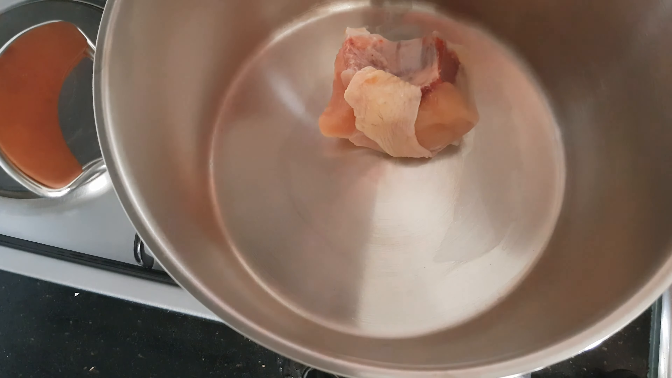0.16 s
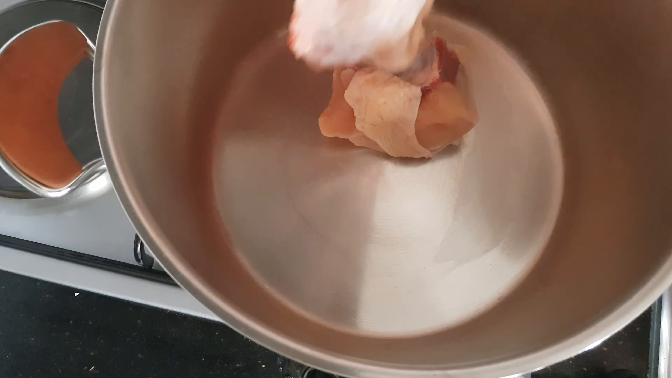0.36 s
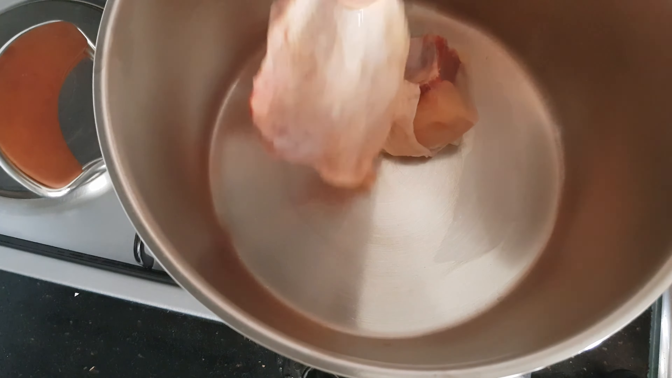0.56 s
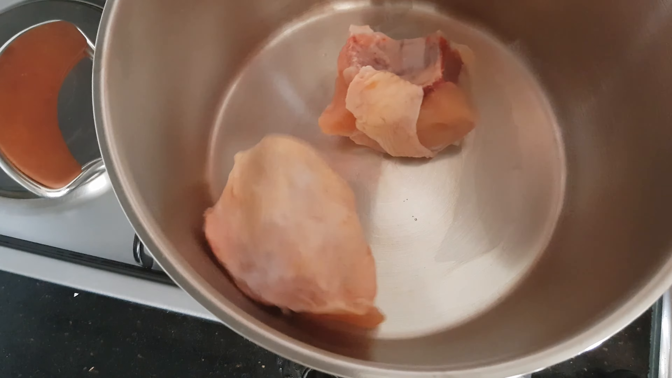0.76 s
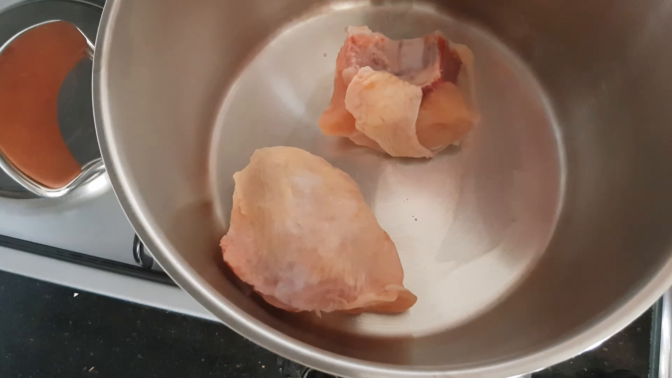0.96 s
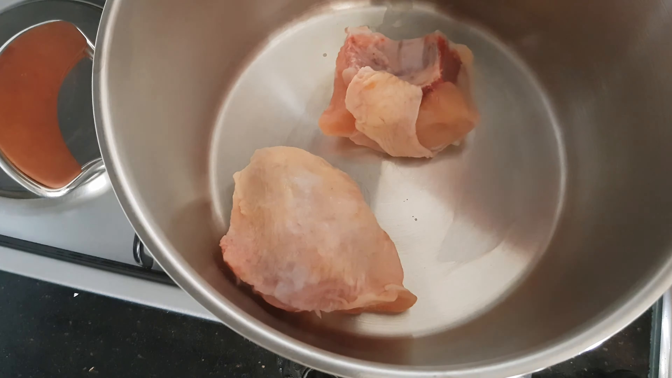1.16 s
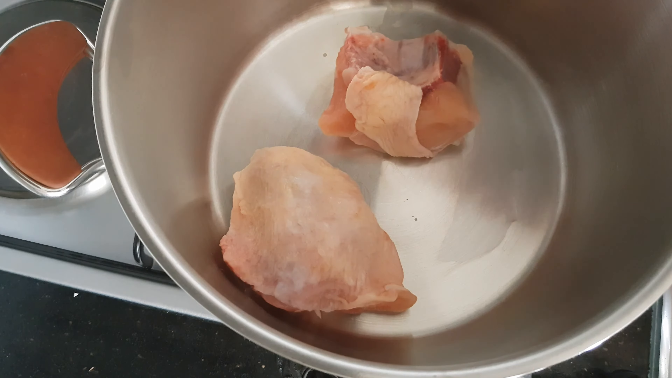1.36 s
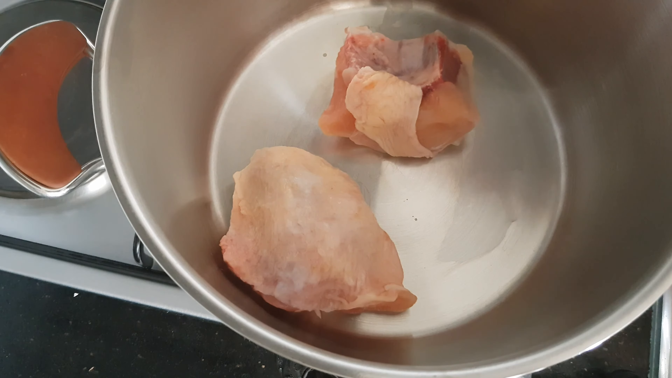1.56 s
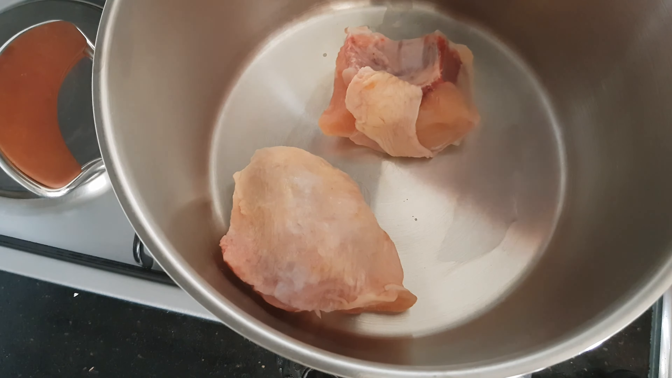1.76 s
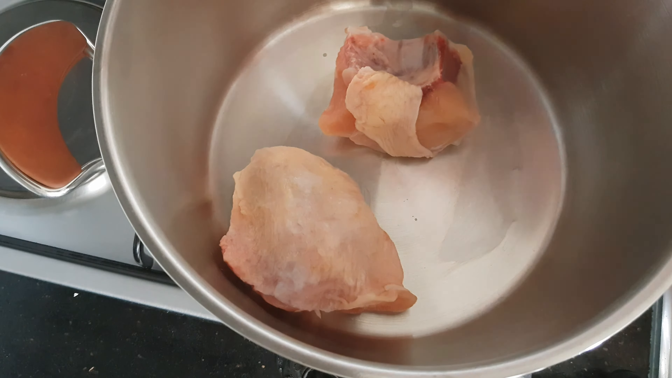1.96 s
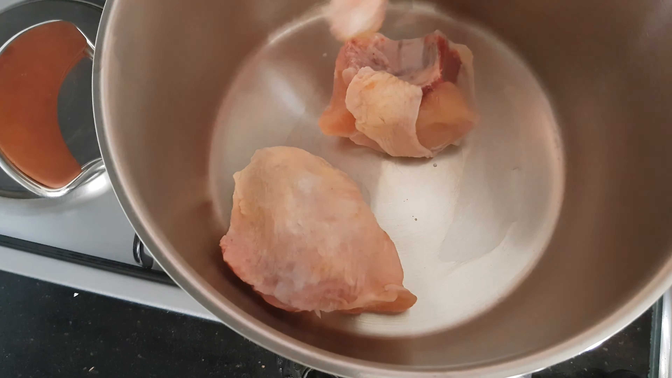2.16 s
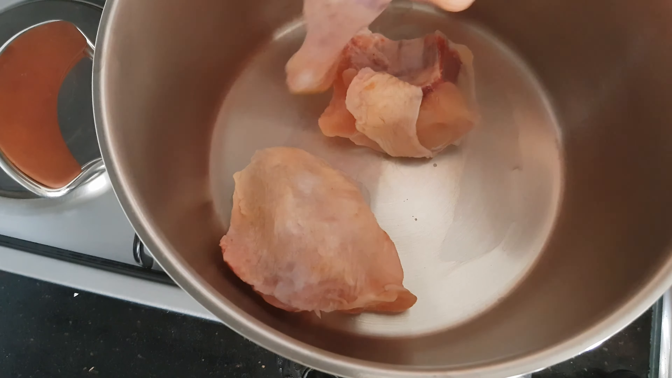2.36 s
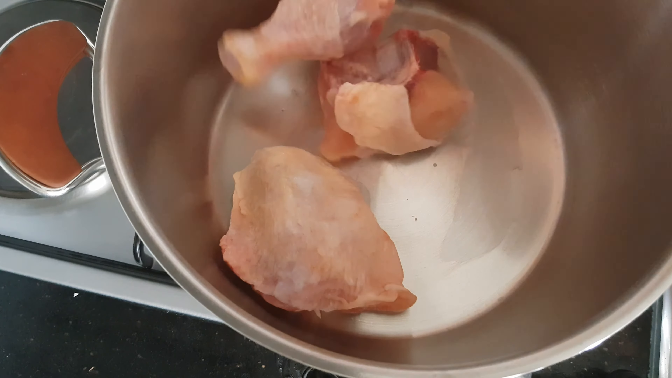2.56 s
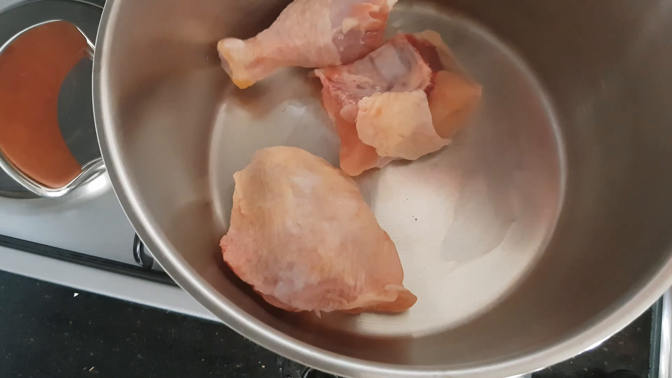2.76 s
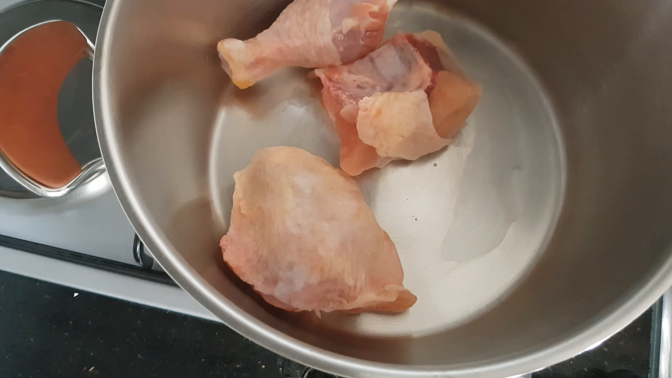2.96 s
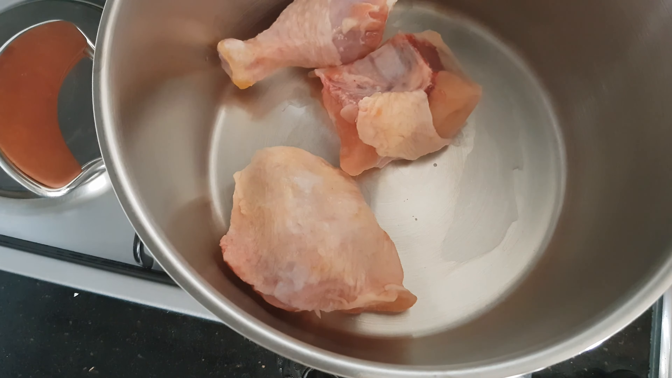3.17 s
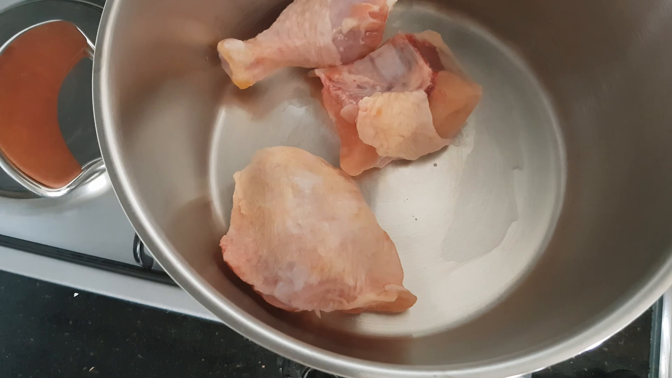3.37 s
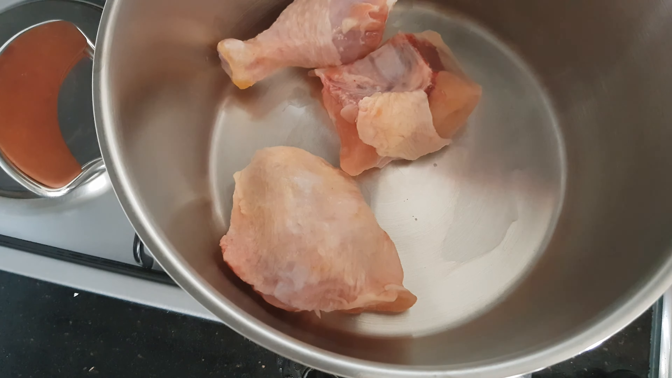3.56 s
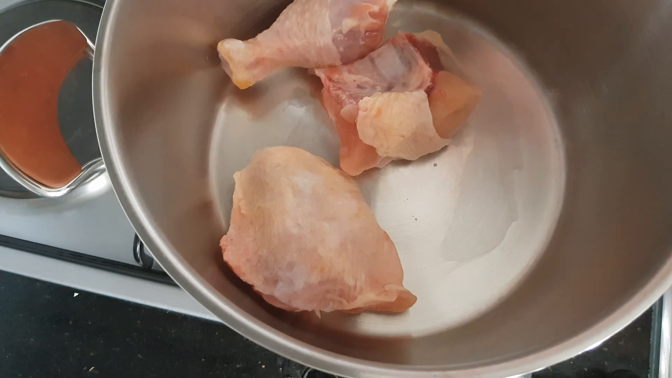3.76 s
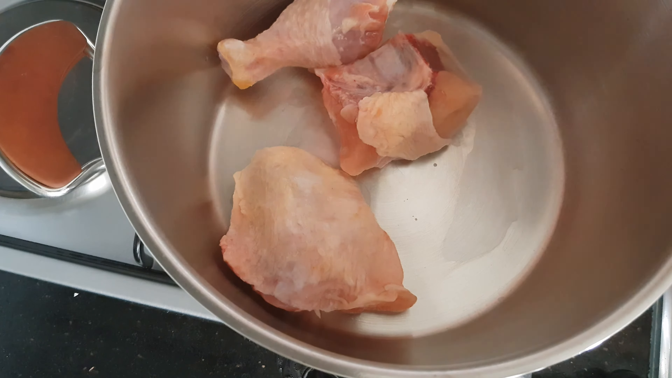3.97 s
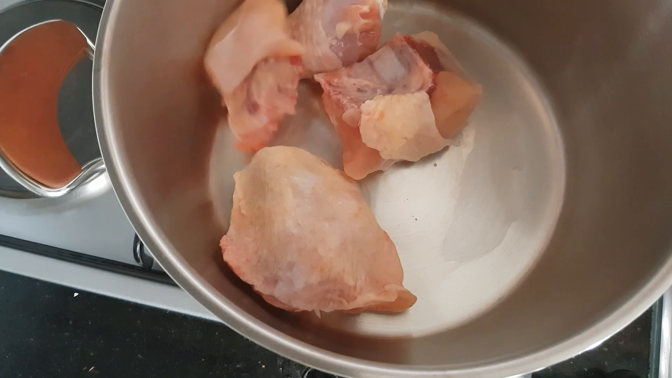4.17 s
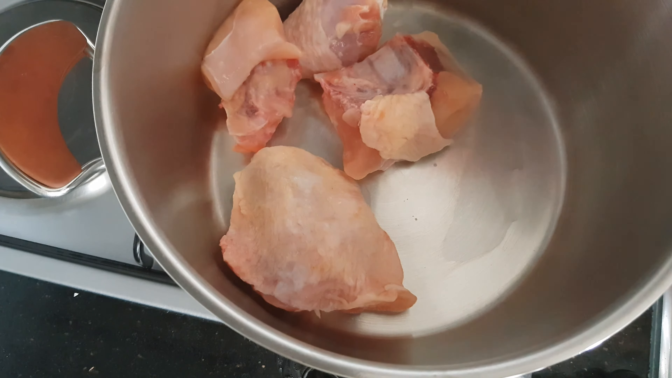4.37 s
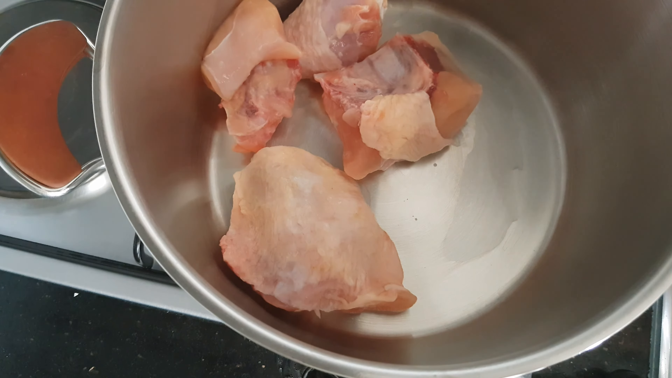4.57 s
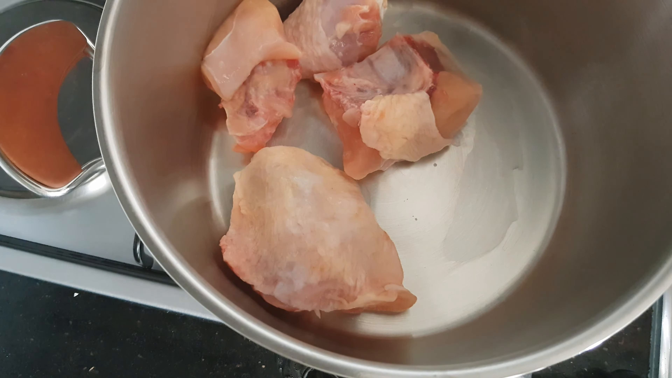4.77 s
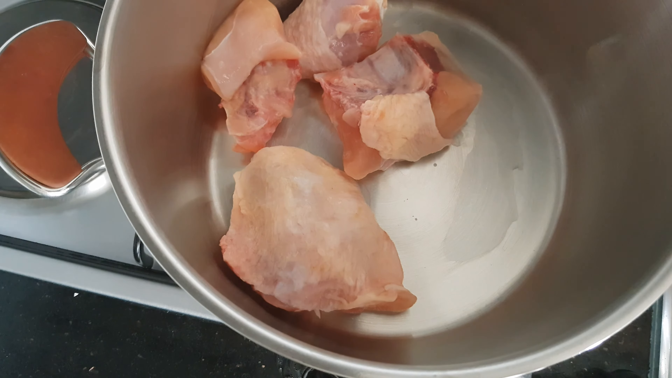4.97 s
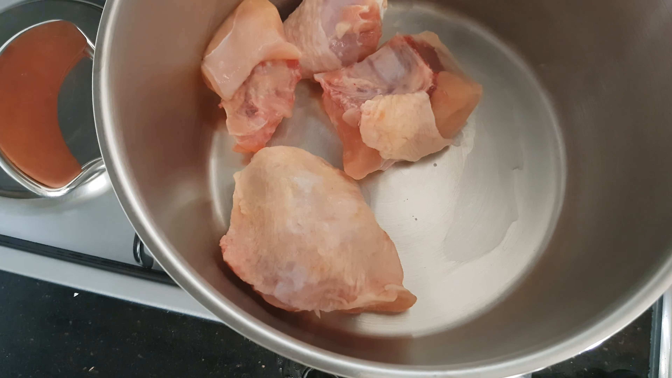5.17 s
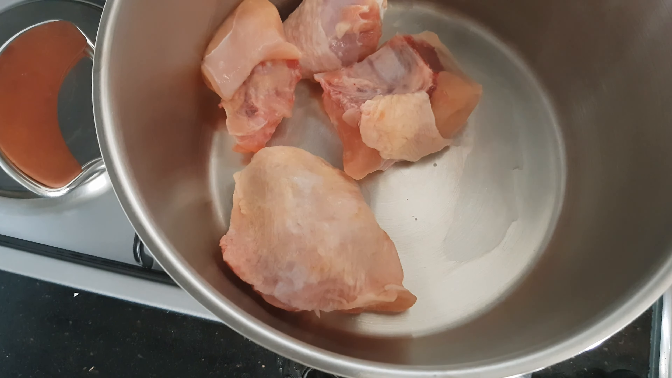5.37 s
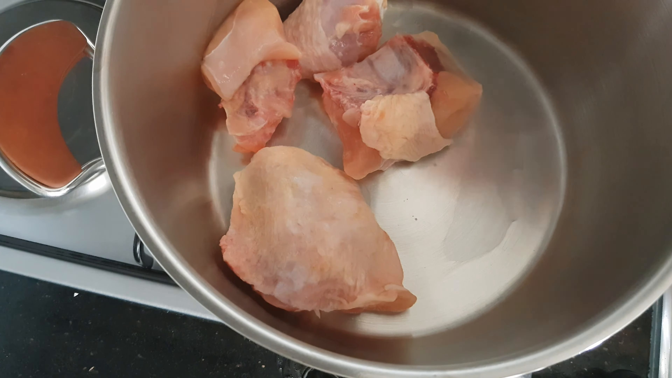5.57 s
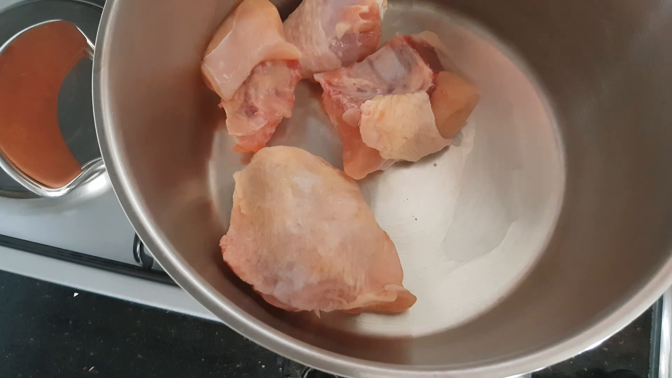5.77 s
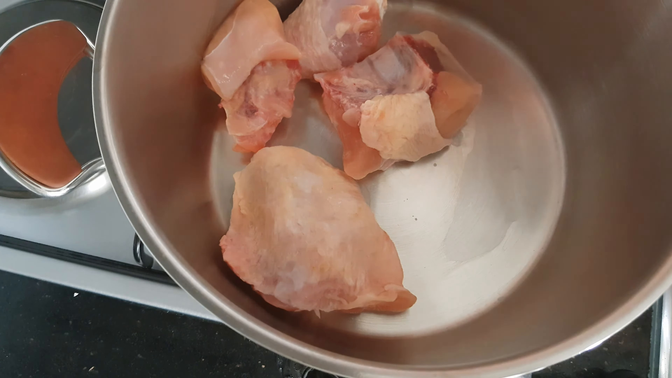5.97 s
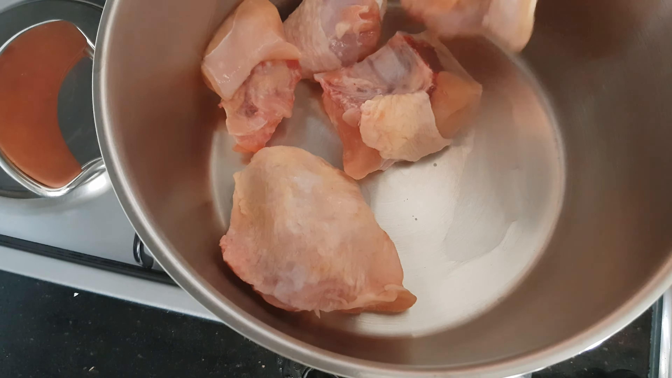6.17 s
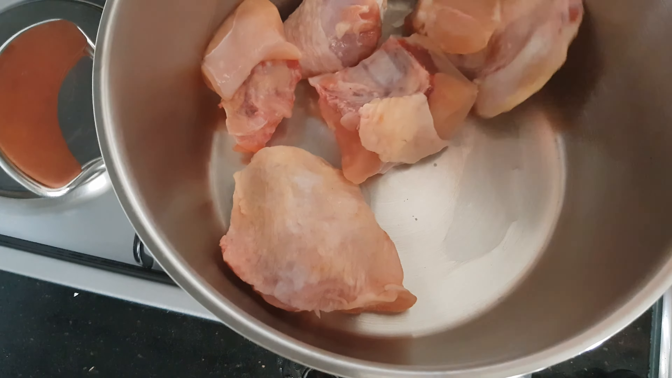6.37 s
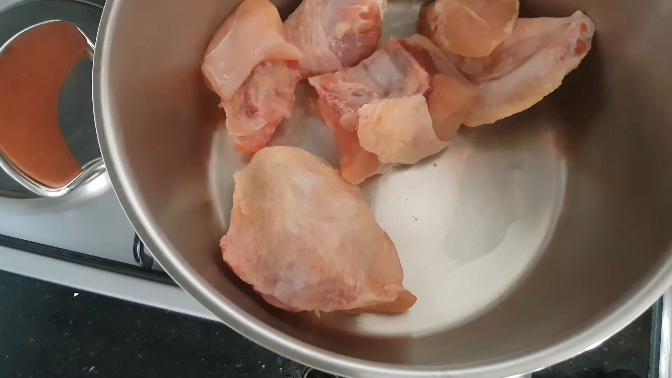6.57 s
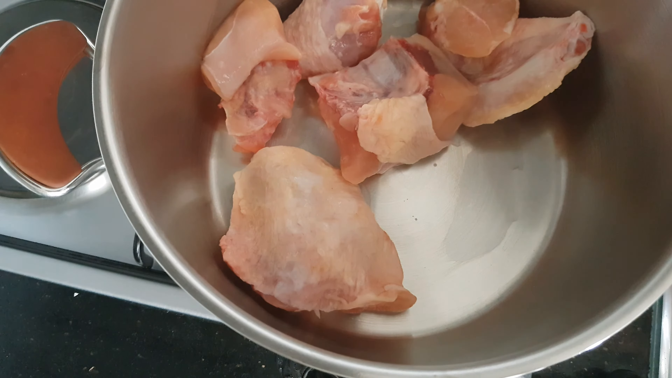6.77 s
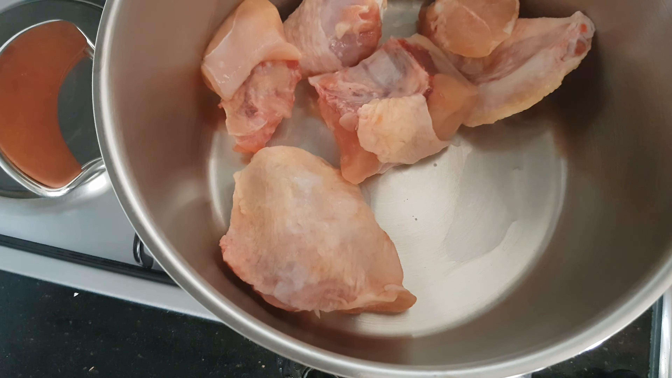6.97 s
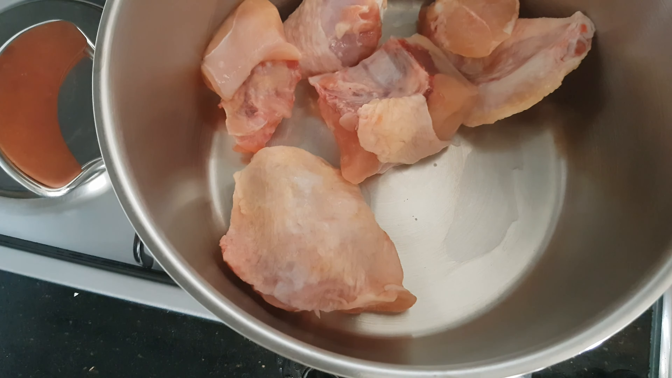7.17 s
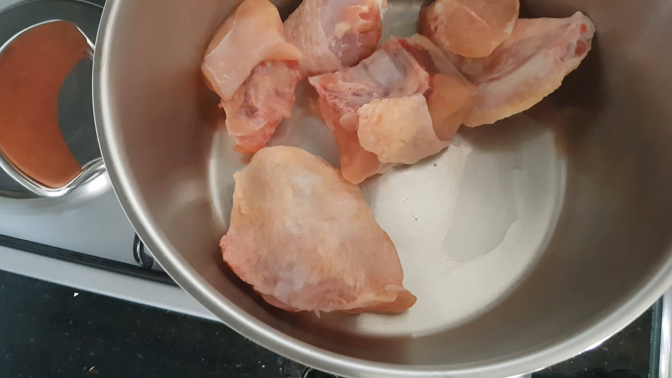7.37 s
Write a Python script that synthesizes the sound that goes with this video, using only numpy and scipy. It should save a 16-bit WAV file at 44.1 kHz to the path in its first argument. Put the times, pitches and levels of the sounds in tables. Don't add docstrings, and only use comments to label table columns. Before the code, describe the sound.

A quiet kitchen, heard closely in stereo, with low airy hum and slow distant traffic rumble throughout. At about 0.6 s raw meat drops into a steel pot: soft low thud, wet slap and squelch, then a flurry of short clanks peaking near 0.77 s as the pot rocks on its grate. Faint sticky ticks follow from 1.2 to 1.7 s. At 2.45 s a second piece smacks down, with firmer clanks at 2.6 and 2.67 s. Fingers click stickily on the right around 3.0-3.25 s. A third, duller and wetter landing comes at 4.05 s, with muted knocks until 4.2 s. More tiny clicks run from 4.6 to 5.4 s. The last piece lands at 6.25 s, the brightest clank at 6.3 s, rattling until 6.6 s with short echoes and low swaying. A faint wet touch comes at 7.2 s.

```python
import sys
import numpy as np
from scipy import signal
from scipy.fft import rfft, irfft, next_fast_len
from scipy.io import wavfile
from scipy.ndimage import uniform_filter1d

SR = 44100
rng = np.random.default_rng(int(sys.argv[2]) if len(sys.argv) > 2 else 0)


def magnitude_from_level(level_db):
    exponent = np.asarray(level_db, float) / 20
    return 10 ** exponent


def to_wav(sig):
    pcm = np.clip(np.atleast_2d(sig), -1, 1) * 32767
    pcm = np.round(pcm).astype(np.int16)
    wavfile.write(sys.argv[1], SR, pcm.T)


N = 327655


def evened(x):
    return x / np.sqrt(np.mean(np.abs(x) ** 2) + 1e-20)


def read(points, hz):
    f, value = np.transpose(points)
    return np.interp(np.log(hz + 1), np.log(f + 1), value)


def add(mix, start_s, sound):
    part = mix[:, round(start_s * SR):][:, :sound.shape[1]]
    part += sound[:, :part.shape[1]]


def sides(pan_db):
    return magnitude_from_level(np.array([[pan_db / 2], [-pan_db / 2]]))


def colour(x, points):
    size = next_fast_len(x.shape[-1])
    gain = magnitude_from_level(read([(1, -90)] + list(points), np.fft.rfftfreq(size, 1 / SR)))
    shaped = irfft(rfft(x, size) * gain, size)
    return evened(shaped[..., :x.shape[-1]])


def crackle(per_s, spread_db, same):
    size = magnitude_from_level(spread_db * np.minimum(rng.exponential(1, N), 4)) * (rng.random(N) < per_s / SR)
    shared, left, right = rng.standard_normal((3, N))
    puffs = 1 + signal.oaconvolve(size, np.exp(-np.arange(200) / 17.0))[:N]
    same = np.clip(same, 0, 1)
    return puffs * (same * shared + np.sqrt(1 - same ** 2) * np.array([left, right]))


def held(rows, rise_s):
    t, power = np.arange(N) / SR, np.zeros(N)
    for start_s, hold_s, db, t60_s in rows:
        release_db = -60 * np.maximum(t - start_s - hold_s, 0) / max(t60_s, .02)
        rise = np.clip((t - start_s) / rise_s, 0, 1)
        power += (magnitude_from_level(db + release_db) * rise) ** 2
    return np.sqrt(power)


def pot():
    # start in seconds, peak in dB, low modes in dB,
    # wall modes in dB, high modes in dB.
    clanks = [(0.658, -32.5, 6.5, -17, -12), (0.694, -34, 8, -3, -12), (.743, -36.5, 6, -10, -13),
              (.774, -20.5, -2, 0.5, -4), (0.8108, -25, 1, 12, -10), (0.839, -32.5, -1, 5, -7),
              (2.462, -36, 0, 1, -34), (2.566, -56, -10, -2, 10), (2.6007, -22, -3, -9, -9.5),
              (2.6727, -18, -4, -14, -7.5), (2.714, -33, -2, -11, -15), (4.075, -27, 4.5, -19, -5),
              (4.11, -23.5, -3, -26, -7), (4.172, -30, -5, -14, -16), (4.2067, -39.5, 5, -11, -14),
              (6.249, -49, 4, 7, -7), (6.274, -29, 7, 0, -12), (6.314, -14.5, -2, 15, -7.5),
              (6.414, -20.5, 0.5, -2, -6.5), (6.4904, -23.5, -2.5, -1.5, -8), (6.538, -41, 4, -15, -20),
              (6.583, -43, 5, -16, -31)]
    # start in seconds,
    # left-right in dB, floor pair in dB, rim pair in dB, top modes in dB.
    landings = [
        (.6, 2, -6.5, -1, -6),
        (2.4, 2.4, -2.4, -5.5, 1),
        (4.0, 5, 0.5, -12, -9),
        (6.2, 1.5, 0, 1, 0.5),
    ]
    mode_hz = [486, 955, 1248, 1578, 1895, 1990, 2060, 2190, 2270, 2475, 2665, 2800, 2890, 3275, 3450, 3590,
               3770, 4340, 4590, 4750, 5080, 5300, 5900, 6250, 6560, 6900, 7250, 7710, 8800, 9780]
    # level in dB, t60 in seconds, left lead in radians, left-right in dB.
    modes = [(-19, 0.22, 0.5, 3.5), (-8, .08, 0, 0.5), (-6.5, 0.069, -0.3, 0.5), (-15, 0.079, -1, -1.5),
             (3, 0.064, -1.2, 1), (2.5, 0.067, 1.5, 4), (-15, .06, -3, 1), (-3, .09, 3.5, 6.5),
             (-6.5, 0.1, 4, 7), (-12.5, 0.061, 0.6, -4), (-13.5, .03, 5, 14), (-16.5, 0.029, -2, 4.5),
             (-21.5, .04, -3, 1.5), (-5, .045, -0.7, 13), (-3, .045, -0.8, 1.5), (-4.5, 0.07, -3, 1.5),
             (-27.5, .04, -1.5, 2.5), (-22, .07, -2, 7.5), (-9, 0.078, -2.2, 4.5), (-15, .06, -0.5, 1.5),
             (-11, 0.16, 2, -10), (-19.5, 0.081, -4.5, -1.5), (-17.5, .07, -1.5, -3), (-14, 0.13, 2, -2.5),
             (-28, 0.074, -0.5, -4), (-19, .08, -3, 2.5), (-22, 0.17, 1, -7.5), (-26, 0.12, 1.3, -3),
             (-26.5, 0.056, 7, -0.5), (-22, .07, 3.5, 3.5)]
    wall_modes = [3, 10, 11, 12, 21]
    db, t60_s, lead, lean_db = np.transpose(modes)[:, :, None]
    hz, t, out = np.array(mode_hz)[:, None], np.arange(9000) / SR, np.zeros((2, N))
    wall = np.isin(np.arange(len(modes)), wall_modes)[:, None]
    chance = rng.standard_normal((len(clanks), 7, len(modes), 1))
    grit = rng.standard_normal((len(clanks), 2, len(t)))
    for row, luck, noise in zip(clanks, chance, grit):
        start_s, peak_db, low_db, wall_db, high_db = row
        detune, phase, strike, skew, damping, beat_rate, beat_phase = luck
        pan_db, floor_db, rim_db, top_db = [place[1:] for place in landings if place[0] <= start_s][-1]

        share_db = low_db * (hz < 1400) + wall_db * wall + (high_db + 6) * (hz > 3000)
        share_db = share_db + floor_db * (abs(hz - 1970) < 100)
        share_db = share_db + rim_db * (abs(hz - 2230) < 50) + top_db * (hz > 4200)
        bounce = 1 + 1.6 * np.exp(-(t / .0045) ** 3)
        decay = magnitude_from_level(-60 * t / (t60_s * magnitude_from_level(0.77 * damping))) * bounce
        turn = 2 * np.pi * hz * (1 + .002 * detune) * t + .3 * phase
        beat = 1 + .25 * np.sin(2 * np.pi * (45 + 15 * beat_rate) * t + 2 * beat_phase)
        height = magnitude_from_level(db + share_db + 0.93 * strike) * decay * beat
        left = height * magnitude_from_level(lean_db / 2) * np.sin(turn)
        right = height * magnitude_from_level(-lean_db / 2) * np.sin(turn - lead + .3 * skew)
        ring = np.array([left.sum(0), right.sum(0)])

        rattle = colour(noise, [(700, -20.0), (1000, 5), (2200, 2.0), (3500, high_db), (8000, high_db - 14.5),
                                (11000, high_db - 22.5), (15000, high_db - 50.5)])
        rattle_decay = magnitude_from_level(-60 * t / 0.05) + magnitude_from_level(-10 - 60 * t / .2)
        ring = ring / abs(ring).max() + magnitude_from_level(-25) * rattle * rattle_decay
        sizzle = colour(noise[::-1], [(5000, -24.0), (7500, 5.0), (12000, -2.5), (14000, -21), (15000, -42.0)])
        sizzle_db = high_db - 33.5 + .5 * (peak_db + 10.0)
        ring += magnitude_from_level(sizzle_db) * sizzle * magnitude_from_level(-60 * t / 0.094)

        contact_s = 0.00074 + .00008 * magnitude_from_level(-.9 * high_db)
        ring *= 1 - np.exp(-t / contact_s)
        add(out, start_s, magnitude_from_level(peak_db + 1.5) * sides(pan_db) * ring / abs(ring).max())
    return out


def thuds():
    # start in seconds, peak in dB, pitch in Hz.
    pushes = [(.616, -40.5, 81.5), (0.631, -38, 60), (0.669, -32, 243), (0.706, -35, 78), (0.73, -37.5, 78),
              (0.78, -40, 260), (0.809, -35.5, 112), (0.858, -42, 69), (2.446, -27, 265), (2.605, -53, 78),
              (2.67, -44, 178), (4.049, -47.5, 52.6), (4.1, -57, 65), (6.245, -36.5, 147),
              (6.271, -35.5, 108), (6.28, -33, 97), (6.298, -32.5, 66), (6.408, -48, 81), (6.493, -43, 79)]
    cycles = 2.2
    t, out = np.arange(9000) / SR, np.zeros((2, N))
    for start_s, peak_db, hz in pushes:
        decay = magnitude_from_level(-60 * (t * hz / cycles) ** 1.8)
        push = -np.sin(2 * np.pi * hz * t) * decay * (1 - np.exp(-t * hz * 38.0))
        add(out, start_s, magnitude_from_level(peak_db) * sides(2.2) * push / abs(push).max())
    return out


def slumps():
    # start in seconds, hold in seconds, level in dB, release t60 in seconds.
    settlings = [
        (.66, 0.082, -50, 0.49),
        (.772, 0.035, -48, 0.61),
        (2.25, 0.099, -62.5, .2),
        (2.444, 0.0037, -47, 0.38),
        (2.6, 0.038, -47.5, 0.45),
        (4.05, 0.013, -54, 0.75),
        (6.246, 0.026, -44.5, 0.76),
    ]
    # frequency in Hz, level in dB.
    spectrum = [(50, -20.5), (90, 8.5), (170, -1), (300, -0.5), (470, -2), (700, -10.5), (1100, -9.5),
                (1800, -29.5), (3500, -82.5)]
    wobble = colour(crackle(300, 2, same=.96), spectrum)
    return held(settlings, rise_s=0.0054) * sides(1.5) * wobble


def sways():
    # loudest moment in seconds, half length in seconds, peak in dB, pitch in Hz.
    swells = [
        (1.37, 0.051, -56, 97.5),
        (6.37, 0.048, -48.5, 100),
        (6.57, 0.074, -55.5, 88.6),
        (6.77, 0.045, -49, 103),
    ]
    t, out = np.arange(9000) / SR, np.zeros((2, N))
    for middle_s, half_s, peak_db, hz in swells:
        swell = np.exp(-((t - .1) / half_s) ** 2) * np.sin(2 * np.pi * hz * t)
        add(out, middle_s - .1, magnitude_from_level(peak_db) * sides(2.1) * swell)
    return out


def smears():
    # start in seconds, fizz peak in dB, squelch in dB, t60 in seconds.
    presses = [(.562, -66, -63, 0.088), (.614, -64, -59, 0.28), (.668, -51, -71, 0.1),
               (.683, -48, -38, 0.12), (0.701, -59, -42.5, .2), (.718, -51, -44, 0.064),
               (0.764, -43, -40.5, 0.12), (0.7775, -31.5, -34.5, 0.081), (0.8, -60, -31, 0.13),
               (1.73, -82, -72, 0.97), (2.4454, -42.5, -44, 0.038), (2.452, -56, -51, 0.4),
               (2.485, -54.5, -63, .3), (2.545, -58, -70, .18), (2.566, -58.5, -49, 0.78),
               (4.035, -52, -60, 0.084), (4.05, -46.5, -50, 0.28), (4.062, -57, -45, 0.36),
               (4.081, -46, -36.5, 0.2), (4.10, -49.5, -45, .12), (4.135, -62.5, -46, 0.14),
               (6.246, -49, -45.5, 0.21), (6.269, -69, -34.5, 0.14), (6.3149, -32, -43, 0.12),
               (7.169, -61, -61, 0.13)]
    # frequency in Hz, level in dB.
    squelch_colour = [(500, -16), (1500, 0.5), (3000, -5.5), (4600, -1), (5500, -1.5), (6600, 0.5),
                      (7800, -9), (9500, -31.5), (12000, -27)]
    # frequency in Hz, level in dB.
    fizz_colour = [(5000, -18), (7500, -3.5), (9500, -4), (11000, -3.5), (14000, -4), (16000, -13.5)]
    rise_s = 0.0013
    t, power = np.arange(16000) / SR, np.zeros((2, N))
    for start_s, fizz_db, squelch_db, t60_s in presses:
        shape = magnitude_from_level(-60 * t / max(t60_s, .01)) * np.minimum(t / rise_s, 1)
        add(power, start_s, magnitude_from_level(2 * np.array([[fizz_db], [squelch_db]]) - 15.5) * shape ** 2)
    fizz = colour(crackle(830, 1.8, same=0.23), fizz_colour)
    squelch = colour(crackle(620, 1.0, same=0.39), squelch_colour)
    return np.sqrt(power[0]) * fizz + np.sqrt(power[1]) * squelch


def snaps():
    # start in seconds, peak in dB, lower part in dB.
    smacks = [(.5671, -51, -4), (.614, -50, -2), (.6689, -64, -6.5), (0.6824, -42.5, 0), (0.719, -28, -12),
              (0.7814, -33.5, 2), (2.446, -36, -2.5), (2.5451, -49.5, -7.5), (2.5676, -48, -0.5),
              (4.0347, -52, -11), (4.05, -34, -2.1), (6.2475, -41, -8.5), (6.2724, -60.5, 12)]
    # start in seconds, peak in dB, left-right in dB, lower part in dB.
    peels = [(1.2111, -49, 3, 9), (1.3425, -64, -4, -25), (1.4067, -56, -18, -3), (1.49, -65, -6, -23),
             (1.5294, -54, 0, -6), (1.7015, -69, -5, -7.5), (3.015, -61.5, -13, -17.5),
             (3.0264, -64, -26, -31), (3.0334, -45.5, -5.5, -6), (3.037, -63, -11, -28),
             (3.0604, -58, 3, -15), (3.0929, -57, -17, -26), (3.1445, -45, -10, -28.5),
             (3.1867, -47, -9, -2), (3.235, -38, -22.5, -11.5), (4.6219, -45.5, -7, -2),
             (4.6942, -65.5, -5, -18), (4.7167, -48, -3, -20), (4.787, -54, -8, -27),
             (4.806, -57, -26, -14), (4.82, -60, -8, -20), (4.8279, -46, -14, -27), (4.838, -57, -8, -22),
             (4.9043, -50, -3, -9), (5.024, -57, -3, -8), (5.0494, -71, -3, -11), (5.1414, -49, -3, 0),
             (5.4026, -58.5, -11, -14.5), (7.1706, -68, -1.5, -8), (7.2095, -65.5, -1, -28.5)]
    smack_pan_db = 2.5
    t, out = np.arange(500) / SR, np.zeros((2, N))
    rows = sorted(peels + [(s, db, smack_pan_db, low_db) for s, db, low_db in smacks])
    clean_break = 5 * (np.arange(len(t)) == 12)
    grit = rng.standard_normal((len(rows), 2, len(t))) + clean_break
    for (start_s, peak_db, pan_db, low_db), noise in zip(rows, grit):
        shape = [(1200, low_db - 8.5), (2500, low_db + 0.5), (4000, low_db), (7500, low_db),
                 (9000, -15.5), (12500, 6.5), (16000, 0)]
        tick = colour(noise[0] + .6 * noise, shape) * magnitude_from_level(-60 * t / .005) * np.minimum(t / .0002, 1)
        tick = np.pad(tick, [(0, 0), (30, 30)])
        delay_samples = round(np.clip(-1.6 * pan_db, -20, 20))
        tick[0] = np.roll(tick[0], delay_samples)
        add(out, start_s - 30 / SR, magnitude_from_level(peak_db + 1.5) * sides(pan_db) * tick / abs(tick).max())
    return out


def bubbles():
    # start in seconds, peak in dB, pitch in Hz, t60 in seconds.
    pops = [
        (1.387, -67, 4800, 0.016),
        (1.7015, -63.5, 7450, .015),
        (2.4455, -47, 7570, .012),
        (2.566, -69, 3130, .12),
        (3.188, -60, 7440, .01),
        (4.625, -62, 2390, 0.015),
    ]
    t, out = np.arange(4000) / SR, np.zeros((2, N))
    for start_s, peak_db, hz, t60_s in pops:
        ring = magnitude_from_level(peak_db - 60 * t / t60_s) * np.sin(2 * np.pi * hz * t)
        add(out, start_s, sides(-2.5) * ring * np.minimum(t / .0006, 1))
    return out


def hands():
    # start in seconds, hold in seconds, level in dB, release t60 in seconds.
    rustles = [
        (.45, 0.15, -79.5, 0.25),
        (1.2, 0.23, -78.5, 3),
        (2.2, 0.089, -78.5, .6),
        (3.02, 0.25, -77.5, 0.7),
        (4.62, .55, -80, 0.71),
        (7.165, 0.035, -79, 1.8),
    ]
    # frequency in Hz, level in dB.
    spectrum = [(2500, -3), (3700, -3), (6500, 0.5), (8700, -7.5), (11500, -3.5), (15000, -3)]
    return held(rustles, .02) * sides(-5) * colour(crackle(250, 3, same=.3), spectrum)


def background():
    # frequency in Hz, width in Hz, level in dB.
    hums = [
        (148, 13, -69.5),
        (273, 16, -67),
        (614.8, 11, -74.5),
        (1514, 13, -82.5),
        (3730, 10, -104),
    ]
    # loudest
    # moment in seconds, half length in seconds, deep rumble in dB, rise of the mid wash in dB.
    traffic = [(0.498, .4, -73, 0.5), (0.916, 0.29, -64, 2), (1.343, 0.1, -68, 0), (1.805, 0.074, -63, 6.5),
               (2.528, 0.31, -67.5, 5.5), (4.31, 0.24, -60, 1.2), (4.8, 0.13, -57, 0),
               (5.327, 0.41, -63.5, 3.5), (6.252, 0.35, -71, 3)]
    # frequency in Hz, level in dB.
    rumble_colour = [(20, -44.5), (32, -29), (42, 2), (51, 7), (63, -19.5), (95, -20.5), (125, -26),
                     (200, -61)]
    # frequency in Hz, level in dB per Hz.
    air_colour = [(90, -0.5), (127, -8), (162, -3.5), (200, -19.5), (280, -9), (450, -16), (760, -19.5),
                  (1050, -17.5), (1500, -25.5), (2000, -35), (2800, -43.5), (6500, -43.5), (8600, -52),
                  (11500, -44), (15500, -43)]
    # frequency in Hz, likeness of the ports (-1 to 1).
    air_same = [(60, .98), (170, .86), (300, .85), (520, .63), (700, .38), (900, -.15), (1400, -.38),
                (2200, 0)]
    # frequency in Hz, left-right in dB.
    air_lean = [(60, 2.5), (180, -0.5), (550, -1), (1650, -2), (4970, -1.5), (15000, 2)]
    air_db, rumble_bed_db, left_lead_rad = -59.5, -70, -0.28

    def unit(gain):
        return (gain / np.sqrt((gain ** 2).sum()))[:, None]

    frames, hz = N // 512 + 5, np.fft.rfftfreq(2048, 1 / SR)
    a, b, c, d, patches = rng.standard_normal((frames, 1025, 5)).T
    patches = evened(uniform_filter1d(uniform_filter1d(patches, 14, 0), 8, 1))
    nearest_s, half_s, rumble_db, wash_db = np.transpose(traffic)[:, :, None]
    t = np.arange(frames) * 512 / SR
    near = np.exp(-((t - nearest_s) / half_s) ** 2)
    rumble = np.sqrt(magnitude_from_level(2 * rumble_bed_db) + (magnitude_from_level(2 * rumble_db) * near).sum(0))
    wash = (wash_db * near).sum(0) * np.exp(-np.log((hz[:, None] + 1) / 1000) ** 2 / 2.3)

    air_shape = unit(magnitude_from_level(read(air_colour, hz) - 43 * (hz < 85)))
    power = (magnitude_from_level(air_db + wash + 0.42 * patches) * air_shape) ** 2
    rumble_shape = unit(magnitude_from_level(read(rumble_colour, hz) - 99 * (hz > 200)))
    power += (magnitude_from_level(7.5) * rumble * rumble_shape) ** 2
    for hum_hz, width_hz, db in hums:
        power += (magnitude_from_level(db) * unit(1 / (1 + (2 * (hz - hum_hz) / width_hz) ** 2))) ** 2

    same = np.clip(read(air_same, hz), -1, 1)[:, None]
    left = a + 1j * b
    right = same * left * np.exp(-1j * left_lead_rad) + np.sqrt(1 - same ** 2) * (c + 1j * d)
    lean = magnitude_from_level(read(air_lean, hz) / 2)[:, None]
    z = np.array([left * lean, right / lean]) * np.sqrt(power)
    return magnitude_from_level(1.5) * signal.istft(z, nperseg=2048, noverlap=1536)[1][:, :N]


def kitchen():
    # frequency in Hz, t60 in seconds.
    decay_s = [(300, 0.64), (1000, 0.34), (2200, 0.47), (3700, 0.41), (5000, 0.41), (9000, 0.41),
               (14000, 0.38)]
    taps = np.zeros((2, SR // 2))
    at = np.arange(240, SR // 2 - 20, 20)
    at = at + rng.integers(0, 20, (2, len(at)))
    np.put_along_axis(taps, at, rng.choice([-1., 1.], at.shape), 1)
    hz, t, z = signal.stft(taps, SR, nperseg=256)
    tail = signal.istft(z * magnitude_from_level(-60 * t / read(decay_s, hz)[:, None]), SR, nperseg=256)[1]
    return tail / np.linalg.norm(tail[0])


def scene():
    steel, ticks, wet, tail = pot(), snaps() + bubbles(), smears(), kitchen()
    rest = thuds() + slumps() + sways() + hands() + background()

    scatter_s, scattered = 0.0038, 0.87
    flutter = evened(uniform_filter1d(rng.standard_normal(N), round(scatter_s * SR)))

    rim_hz, rim_t60_s, rim_db = 3724, .8, -4
    rim_filter = signal.iirpeak(rim_hz, rim_hz * rim_t60_s / 1.5, SR)
    rim = magnitude_from_level(rim_db) * flutter * signal.lfilter(*rim_filter, (steel + wet)[0])

    thrown = magnitude_from_level(-9.5) * steel * (1 - scattered + scattered * flutter)
    thrown = thrown + magnitude_from_level(-13.0) * ticks + magnitude_from_level(-13.5) * wet
    echo = signal.fftconvolve(thrown.mean(0)[None], tail, axes=1)[:, :N]
    return steel + rim + ticks + wet + rest + echo


def roll_off(x):
    return signal.sosfilt(signal.butter(12, 16630, fs=SR, output="sos"), x)


def record(dry):
    bass_cut_hz, edge_hz = 40, 15750
    bass_cut = signal.butter(9, bass_cut_hz, "high", fs=SR, output="sos")
    heard = signal.sosfilt(bass_cut, dry)
    edge = signal.firwin(301, edge_hz, window=("kaiser", 5), fs=SR)
    return roll_off(signal.oaconvolve(heard, edge[None], "same"))


dry = scene()
out = record(dry)
to_wav(out)
```